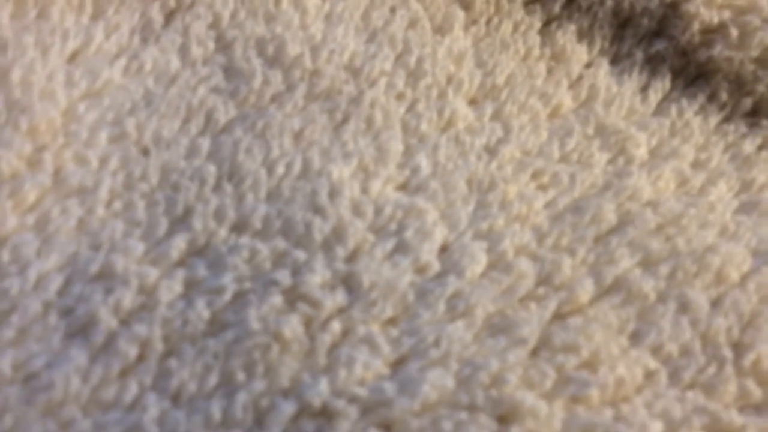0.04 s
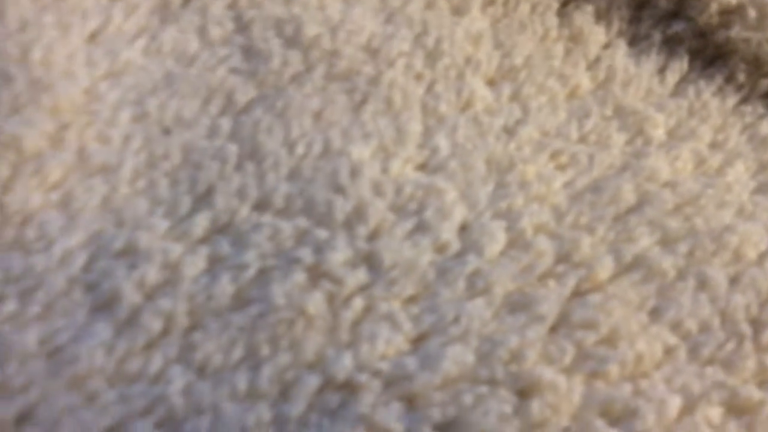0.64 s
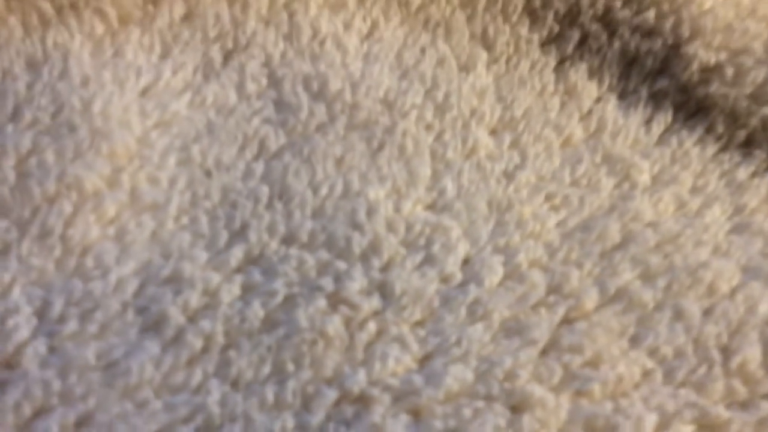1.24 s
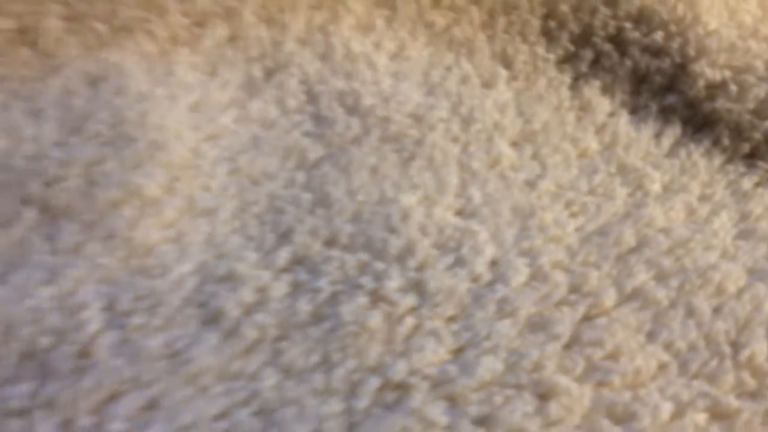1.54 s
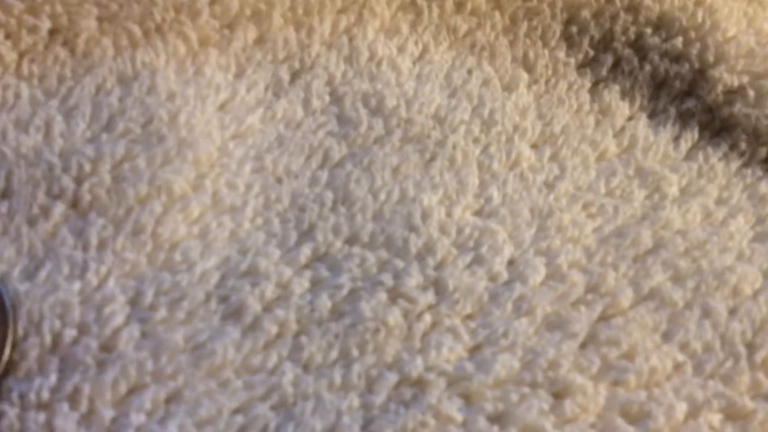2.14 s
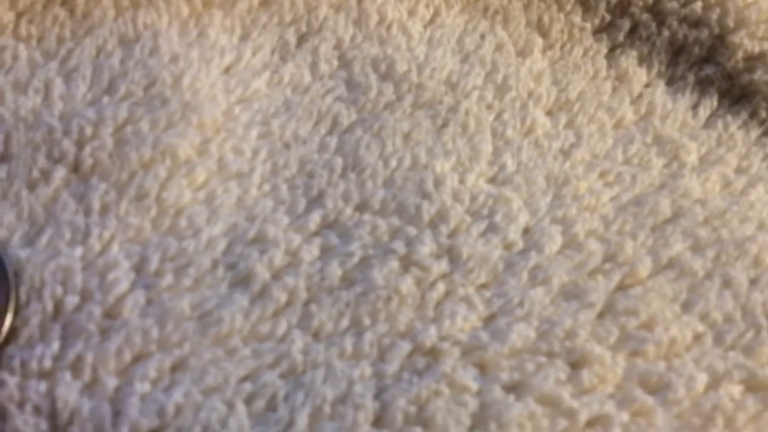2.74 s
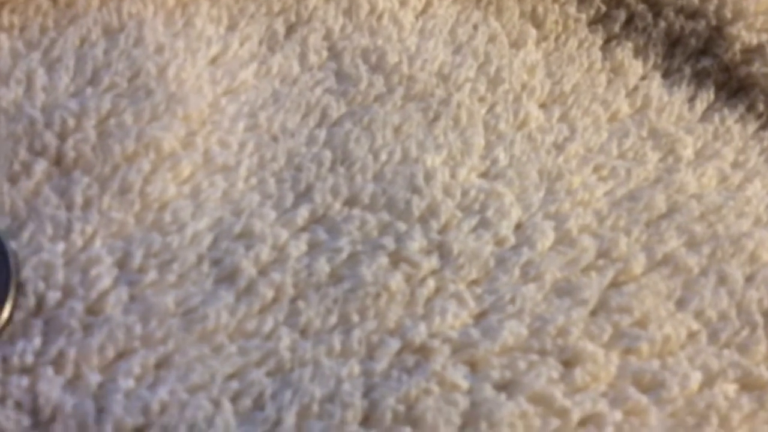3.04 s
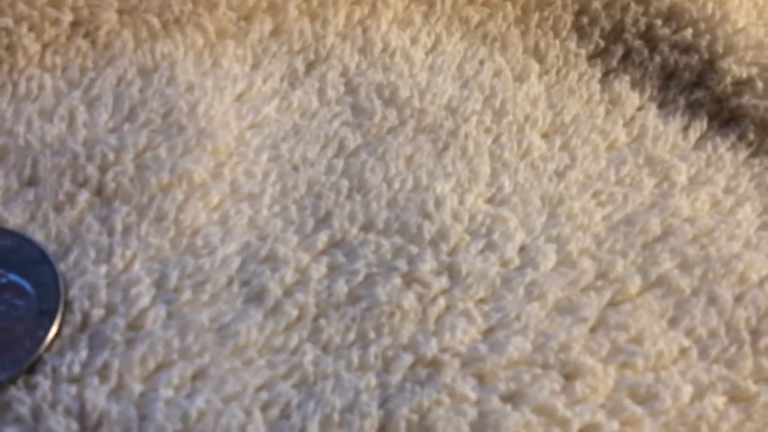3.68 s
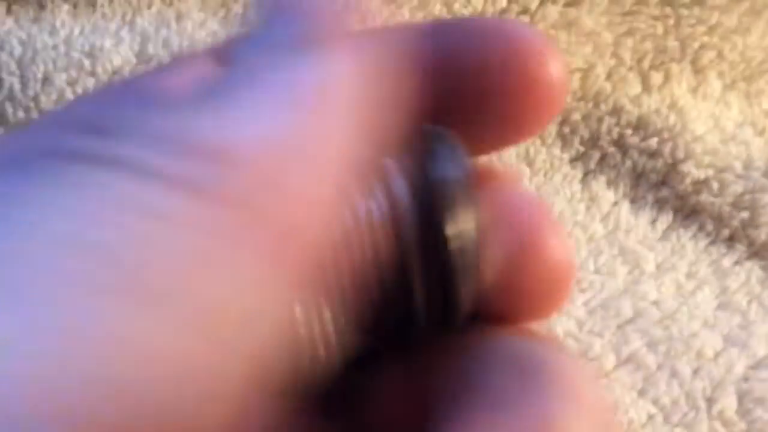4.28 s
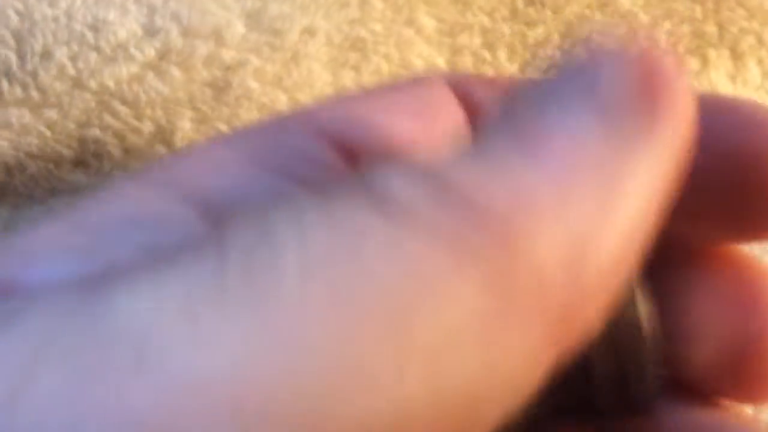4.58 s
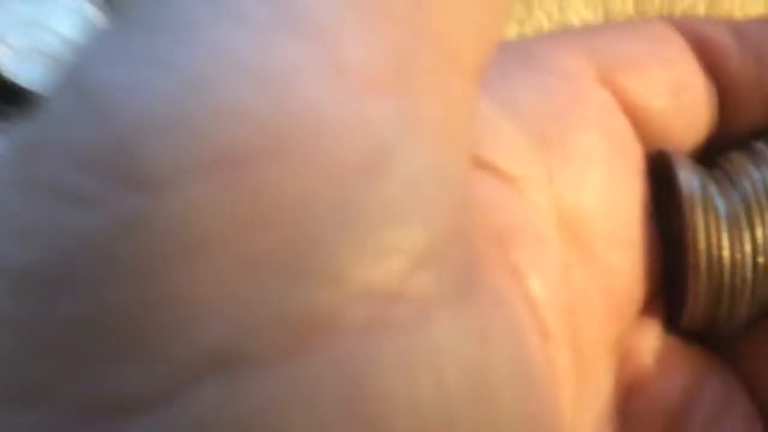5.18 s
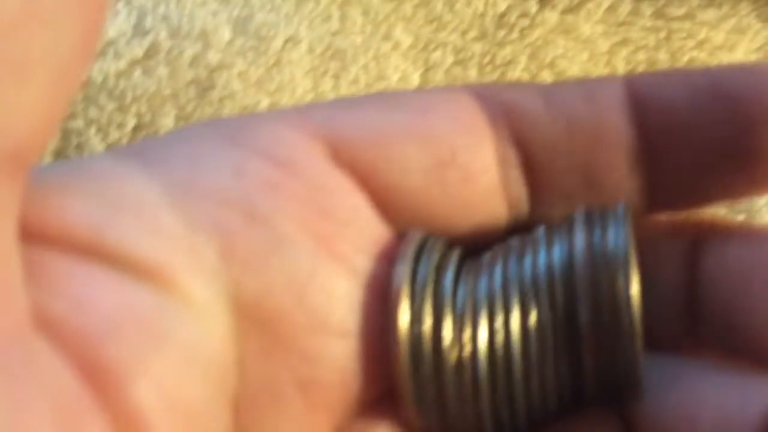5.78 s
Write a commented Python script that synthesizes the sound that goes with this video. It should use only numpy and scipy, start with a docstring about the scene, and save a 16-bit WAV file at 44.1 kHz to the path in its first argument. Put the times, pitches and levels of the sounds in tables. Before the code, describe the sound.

Close, irregular clicks and clinks of coins being stacked by hand, with small scrapes and soft dull bumps.

```python
"""A hand gathers coins into a stack over a towel, close to the microphone, in a quiet room with a low hum.
First the fingers shift, the hand bumps the padding, and pinched coins clack and are damped at once.
Then ridged rims rasp as they slide, and now and then a loose coin rings for a moment.
Near 4 seconds the hand closes around the stack, so the next flurry of clacks sounds hollow.
The tightening stack squeaks faintly, the hand gives a last dull knock, and only faint ticks follow."""
import sys
import numpy as np
from scipy import signal
from scipy.fft import rfft, irfft
from scipy.io import wavfile
from scipy.ndimage import uniform_filter1d

SR = 44100
rng = np.random.default_rng(int(sys.argv[2]) if len(sys.argv) > 2 else 0)


def persist_wave(psi):
    """Save psi, clipped to +-1, as 16-bit WAV."""
    counts = np.round(np.clip(psi, -1, 1) * 32767).astype(np.int16)
    wavfile.write(sys.argv[1], SR, np.atleast_2d(counts).T)


N = 265325

MEDIUM_DB = -30  # harder and softer blows and slides are counted from this level
# The tone of rubbing on coins. Each row: frequency in Hz, gain in dB.
RUB_TONE = [(100, -31), (800, -26.5), (1600, -8), (2700, -2.5), (3800, 0.5), (6000, -2), (9000, -1.5),
            (14000, -2.5), (15400, 0.5), (16500, 6.5)]


def amp(db):
    """Turn decibels into a factor to multiply a sound by."""
    return 10 ** (np.asarray(db) / 20)


def curve_at(points, hz):
    """Look up a value between rows of (frequency, value), on a logarithmic frequency scale."""
    row_hz, value = np.transpose(points)
    return np.interp(np.log(hz + 1), np.log(row_hz + 1), value)


def add(mix, start, sound):
    """Mix a sound in at a start time in seconds."""
    part = mix[max(round(start * SR), 0):][:len(sound)]
    part += sound[:len(part)]


def unit_level(x):
    """Scale a sound so that its average power is 1."""
    return x / np.sqrt(np.mean(x ** 2) + 1e-20)


def coloured(x, tone, body_db=0, top_db=0, body_hz=6800, size=1024):
    """Give a sound a tone, raising or lowering its body (2600 Hz to body_hz) and top (above 13 kHz)."""
    hz = abs(np.fft.fftfreq(size, 1 / SR))
    bass_db = 0.4 * body_db - 4.5
    shelves_db = np.interp(hz, [1300, 2600, body_hz, 9200, 13000, 15000],
                           [bass_db, body_db, body_db, 0, 0, top_db])
    log_gain = np.log(amp(curve_at(tone, hz) + shelves_db))
    response = np.fft.ifft(np.exp(np.conj(signal.hilbert(log_gain)))).real  # no sound ahead of a hit
    return signal.fftconvolve(x, response)[:len(x)]


def contacts(t, per_s, spread_db):
    """Tiny clicks at random moments: many weak, a few strong."""
    chance, sign, force = rng.random((3, len(t)))
    return (chance < per_s / SR) * np.sign(sign - .5) * amp(spread_db * (force ** 2 - 1.5))


def crackle(t, per_s, spread_db, decay_s, rub_db):
    """Each time two surfaces catch, they free a short puff of noise, over a smooth rub."""
    catches = contacts(t, per_s, spread_db)
    energy = signal.lfilter([1], [1, -np.exp(-2 / (decay_s * SR))], catches ** 2)
    loudness = np.sqrt(energy / (energy.mean() + 1e-20) + amp(rub_db) ** 2)
    return loudness * rng.standard_normal(len(t))


def air_and_hum():
    """Steady room air with the hum of an appliance."""
    # The tone of the air. Each row: frequency in Hz, gain in dB.
    air_tone = [(20, -33.5), (40, -17), (60, -11), (110, -8.5), (205, -1), (260, -11), (400, -15.5),
                (700, -23), (1130, -25.5), (1700, -29), (2600, -34.5), (7000, -44.5), (9000, -38),
                (15500, -49)]
    # The notes in the hum. Each row: frequency in Hz, level in dB.
    hum_notes = [(79.5, -71.5), (120, -62), (170, -72.5), (317.6, -74), (1120, -81.5)]
    t = np.arange(N) / SR
    air_gain = amp(curve_at(air_tone, np.fft.rfftfreq(N, 1 / SR)))
    air = irfft(rfft(rng.standard_normal(N)) * air_gain, N)
    hum = sum(amp(db) * np.sqrt(2) * np.sin(2 * np.pi * (hz * t + rng.random())) for hz, db in hum_notes)
    return amp(-56.5) * unit_level(air) + hum


def shifting_fingers():
    """Skin rubs on metal and the held coins tick faintly against one another."""
    # How loud the rubbing is as time passes. Each row: time in seconds, level in dB.
    rub_levels = [(0.05, -80), (0.46, -69.5), (1.05, -64), (1.33, -62), (3.99, -74.5), (4.19, -60),
                  (4.34, -61), (4.8, -72.5), (5.2, -76.5)]
    t = np.arange(N) / SR
    ticks = crackle(t, per_s=59, spread_db=18.5, decay_s=0.0026, rub_db=1)
    loudness = amp(np.interp(t, *np.transpose(rub_levels)))
    return loudness * unit_level(coloured(ticks, RUB_TONE, body_db=-0.5, top_db=-5.5))


def rasp(length, level_db, body_db, top_db):
    """Ridged rims catch and slip: separate ticks in a gentle stroke, a dense rasp in a hard one."""
    t = np.arange(0, length + .01, 1 / SR)
    catches = crackle(t, per_s=2500 * amp(.5 * level_db), spread_db=11.5, decay_s=0.0014, rub_db=-7)
    stroke = np.sin(np.pi * np.minimum(t / length, 1)).clip(0) ** .5
    sound = coloured(catches * stroke, RUB_TONE, body_db, top_db, body_hz=3955)
    return amp(level_db) * unit_level(sound) * np.sqrt(len(t) / SR / length)  # make up for the quiet end


def hand_bumps():
    """The hand makes low thumps as it pushes into the padding, and dull knocks."""
    # Soft pushes. Each row: time of the peak in seconds, level in dB, pitch in Hz, half length in seconds.
    thumps = [(0.2006, -35.5, 67.6, 0.0092), (4.215, -45.5, 68, 0.0071)]
    # Dull knocks. Each row: start in seconds, level in dB, fading time in seconds.
    knocks = [(.201, -40.5, 0.0031), (2.7145, -53, 0.0048), (3.143, -50, 0.0027), (3.608, -39.5, 0.0029),
              (4.863, -39.5, .013)]
    # The tone of a knock. Each row: frequency in Hz, gain in dB.
    knock_tone = [(100, -10), (280, 16), (520, 9.5), (1000, 2.5), (1900, -3), (3000, -13), (6000, -18.5),
                  (15000, -23)]
    t = np.arange(N) / SR
    out = np.zeros(N)
    for peak, db, hz, half_length in thumps:
        swell = np.exp(-((t - peak) / half_length) ** 2)
        out += amp(db) * swell * np.cos(2 * np.pi * hz * (t - peak))
    knock_t = t[:SR // 2]
    for start, db, decay_s in knocks:
        dull_noise = unit_level(coloured(rng.standard_normal(len(knock_t)), knock_tone))
        add(out, start, amp(db) * dull_noise * np.exp(-knock_t / decay_s))
    return out


def held_stack(x, decay_s, size=512):
    """The held stack vibrates very briefly at many pitches, smearing each click."""
    spectrum = rfft(rng.standard_normal(size) * np.exp(-np.arange(size) / SR / decay_s))
    band_energy = uniform_filter1d(abs(spectrum) ** 2, size=15)
    response = irfft(spectrum / np.sqrt(band_energy))  # equal energy in every broad band
    return signal.fftconvolve(x, response[:size // 2])[:len(x)]


def clack(level_db, body_db, top_db, chatter_s, size=2048):
    """Two coins meet and bounce in a quick chatter that dies as their faces close."""
    # The tone of metal hitting metal. Each row: frequency in Hz, gain in dB.
    metal_tone = [(100, -26), (400, -22.5), (800, -12.5), (1500, -10.5), (2300, -9), (3700, -1.5),
                  (5500, 1.5), (7300, 2), (9000, 2), (11500, 1), (14000, 1.5), (15400, 8), (16500, -6)]
    t = np.arange(size) / SR
    closing = np.exp(-(t / (1.15 * chatter_s)) ** 2) + 0.099 * np.exp(-t / (2.3 * chatter_s))
    soft_start = 1 - 0.3 * np.exp(-t / (0.45 * chatter_s))
    bounces = contacts(t, per_s=16000, spread_db=7) * closing * soft_start
    sound = coloured(held_stack(bounces, decay_s=0.00073), metal_tone, body_db, top_db)
    return amp(level_db) * sound * np.sqrt(.004 * SR) / np.linalg.norm(sound)  # energy of 4 ms at level_db


def colliding_coins():
    """Coins scrape and clack, chattering longer the harder they meet; loose ones ring on."""
    # Blows between pinched coins. Each row: start in seconds, level in dB, body gain in dB, top gain in dB.
    pinched_blows = [(.2012, -9, -13, 1.5), (.2104, -14.5, -18, 3), (.256, -20.5, -9.5, 6),
                     (.2809, -26, -8.5, -1.5), (.3004, -33.5, -15, -2.5), (.3366, -33, -14, -7),
                     (.3494, -33.5, -13, -8), (.3757, -17, -19, -6), (.5057, -41, -4, -6),
                     (1.0567, -46, -8, -10.5), (1.1648, -52, -8, 1), (1.2006, -47.5, 2, -9),
                     (1.3791, -23, -10.5, -3), (1.5368, -44, -2, -16.5), (1.5881, -47, -1, -4),
                     (1.707, -51, 1.5, 4), (1.9132, -28, -11.5, 4), (1.92, -25, -9.5, 3),
                     (2.1031, -34.5, -5.5, 7), (2.1669, -38.5, -6.5, -13), (2.1898, -37.5, -8, -4.5),
                     (2.2007, -41, -11.5, -11.5), (2.2793, -28, -3, -4), (2.6162, -46, 5, -10.5),
                     (2.6988, -43, -1, 1), (2.7145, -34.5, -1.5, -19), (2.7832, -38.5, -1.5, -17.5),
                     (2.834, -34.5, -3.5, -10), (2.862, -43.5, -3, -15), (2.9939, -43, -3, 0),
                     (3.0149, -47.5, 1, -9), (3.0605, -47, -2.5, -3), (3.0945, -53, 0, -7.5),
                     (3.1443, -42, 6.5, -18), (3.1675, -48, -6, -6), (3.61, -25, -5.5, -5),
                     (4.0839, -42, -7, -5), (4.1109, -40, 0.5, -5), (4.134, -30, -7, -1),
                     (4.1579, -18.5, -1.5, 7.5), (4.1807, -24.5, -2, 5), (4.2019, -20.5, -1, 2),
                     (4.2103, -9.5, -7, 6), (4.3128, -53, -2, 1), (4.3886, -46.5, -2, -6),
                     (4.4217, -49, 10, -4), (4.4341, -39, 3.5, -8), (4.4431, -37.5, -3, 10),
                     (4.4632, -40, 3, 6), (4.4901, -42.5, 7, -1), (4.5072, -31, 6, 1), (4.5959, -50, 8, -5),
                     (4.9858, -59, 12, -10)]
    # Blows that leave a coin free to ring. Each row: the same four values, then the gain of the ring
    # in dB on top of the blow's level, and which coin rings (0 or 1).
    loose_blows = [(0.2698, -17.5, -17, 0.5, -27.5, 1), (0.3805, -19, -15, -5, -28.5, 1),
                   (.829, -18, -22, -5.5, -20.5, 0), (1.2312, -27, -10, 6, -9, 0),
                   (1.295, -60, -8, -14, 6, 0), (3.2537, -45.5, -13, -9, -10, 0),
                   (3.401, -35.5, -14, 10.5, -37, 1), (3.616, -43.5, -18, -13, 2, 0),
                   (3.638, -34, -15, -7, -2.5, 0), (3.652, -23, -17, 1.5, -9, 0),
                   (3.69, -40, -33, 8, -6.5, 0), (4.218, -15, -35, 3, -11.5, 0)]
    # One list of notes for each loose coin. Each row: pitch in Hz, gain in dB, seconds to fade by 60 dB.
    coin_notes = [
        [(9213, 7.5, 0.05), (9600, -5.5, .06), (13540, -19, .07), (14150, -28, .1), (14560, -14.5, .075),
         (15090, -8.5, .07), (15430, -14.5, .08), (15700, -8, .07)],
        [(9200, -16, 0.15), (11000, -13, .09), (11745, -14, .07), (12370, -10, .09), (12970, 2, 0.065),
         (14180, 0.5, .085), (15600, -13, .1)],
    ]
    out = np.zeros(N)
    for start, level_db, body_db, top_db, *_ in list(pinched_blows) + list(loose_blows):
        force_db = level_db - MEDIUM_DB
        add(out, start, clack(level_db, body_db, top_db, chatter_s=.0021 * amp(.45 * force_db)))
        scrape = rasp(length=.024, level_db=-52 + 0.95 * force_db, body_db=body_db + 1.5, top_db=top_db)
        add(out, start - .009, scrape)  # the faces begin to scrape just before the blow
    for start, level_db, _, _, ring_db, coin in loose_blows:
        add(out, start, amp(level_db + ring_db) * ring(coin_notes[int(coin)]))
    return out


def sliding_coins():
    """Coins slide over one another; louder slides have a slightly brighter top."""
    # The slides. Each row: start in seconds, length in seconds, level in dB, body gain in dB.
    slides = [(0.216, .035, -42, -6.5), (0.245, 0.036, -37.5, -6.5), (0.355, .026, -40.5, -15),
              (.628, 0.04, -45.5, -13.5), (0.975, .065, -57.5, 0.5), (1.35, 0.065, -41.5, -10),
              (1.418, 0.26, -56.5, -5), (1.445, 0.037, -56.5, -5), (2.269, 0.041, -44.5, -2.5),
              (3.21, 0.0163, -55.5, -5), (3.652, 0.01445, -26, -24.5), (3.666, 0.026, -41.5, -18),
              (3.973, 0.25, -60.5, 6), (4.129, 0.0209, -33, 0), (4.145, .068, -27.5, -5.5),
              (4.223, .033, -34, -11.5), (4.254, .025, -43, -14.5), (4.303, 0.28, -64.5, 8.5),
              (4.452, 0.065, -53.5, 12.5), (4.596, 0.034, -58.5, 18), (5.949, 0.023, -70.5, 10)]
    out = np.zeros(N)
    for start, length, level_db, body_db in slides:
        add(out, start, rasp(length, level_db, body_db, top_db=-1 + .05 * (level_db - MEDIUM_DB)))
    return out


def ring(notes, size=8192):
    """A loose coin flexes at several pitches at once, each struck with a slightly different force."""
    t = np.arange(size) / SR
    tones = np.zeros(size)
    for hz, db, fade_s in notes:
        loudness = amp(db + rng.normal(0, 1.5) - 60 * t / fade_s)
        tones += loudness * np.sin(2 * np.pi * (hz * t + rng.random()))
    return tones * (1 - np.exp(-t / .0006))


def cupped_hand(x, start_s=3.85, closing_s=0.138):
    """The hollow of the closing hand lifts the coins' middle pitches and thins what lies below."""
    def band(sound, centre_hz, width_hz):
        return signal.lfilter(*signal.iirpeak(centre_hz, centre_hz / width_hz, fs=SR), sound)

    closed = np.clip((np.arange(N) / SR - start_s) / closing_s, 0, 1)
    hollow = amp(-1.5) * band(x, centre_hz=3740, width_hz=2000)
    swallowed = 0.46 * band(x + hollow, centre_hz=1150, width_hz=900)
    return x + closed * (hollow - swallowed)


def squeak():
    """The tightening stack sticks and slips, giving a thin falling tone of unsteady strength."""
    # The path of the squeak. Each row: time in seconds, pitch in Hz, level in dB before the grip varies it.
    glide = [(4.62, 6120, -72), (4.661, 5880, -68), (4.71, 5646, -70), (4.74, 5180, -74)]
    times, hz, db = np.transpose(glide)
    t = np.arange(N) / SR
    grip = 1.04 + 0.52 * unit_level(uniform_filter1d(rng.standard_normal(N), size=200))
    loudness = np.interp(t, times, amp(db), left=0, right=0)
    phase = 2 * np.pi * np.cumsum(np.interp(t, times, hz)) / SR
    return loudness * grip * np.sin(phase)


def room(x, near_db, tail_db):
    """Quick echoes from nearby surfaces, then the short tail of a furnished room."""
    # How long the room holds a sound. Each row: frequency in Hz, seconds to fade by 60 dB.
    fade_times = [(200, 0.29), (2000, .25), (8000, 0.18), (16000, .17)]
    t = np.arange(SR // 2) / SR
    near = contacts(t, per_s=1500, spread_db=12.5) * np.exp(-t / .006) * (t > .002)
    hz, times, bands = signal.stft(rng.standard_normal(len(t)) * (t > .006), SR, nperseg=256)
    fade = amp(-60 * times / curve_at(fade_times, hz)[:, None])
    tail = signal.istft(bands * fade, SR, nperseg=256)[1][:len(t)]
    response = amp(near_db) * near / np.linalg.norm(near) + amp(tail_db) * tail / np.linalg.norm(tail)
    return x + signal.fftconvolve(x, response)[:N]


def scene():
    """The coins and the hand sound in the room, over its air and hum, in one channel."""
    coins = cupped_hand(colliding_coins() + sliding_coins())
    handling = coins + shifting_fingers() + squeak() + hand_bumps()
    return (room(handling, near_db=-12.5, tail_db=-34.5) + air_and_hum())[None]


def record(dry):
    """The recorder cuts off the very highest treble."""
    low_pass = signal.firwin(201, cutoff=15950, window=("kaiser", 8), fs=SR)
    return signal.oaconvolve(dry, low_pass[None], "same")


dry = scene()
out = record(dry)
persist_wave(out)
```